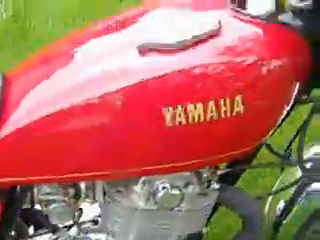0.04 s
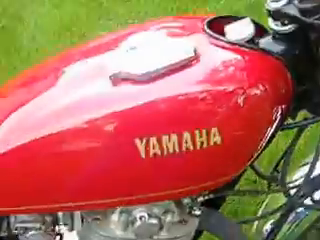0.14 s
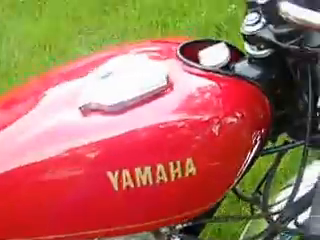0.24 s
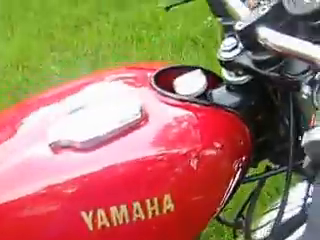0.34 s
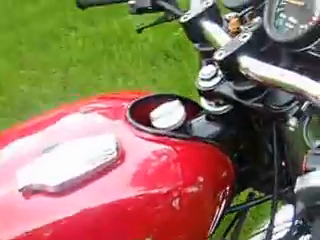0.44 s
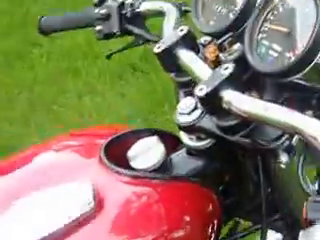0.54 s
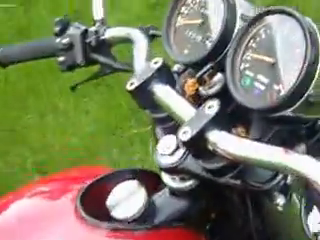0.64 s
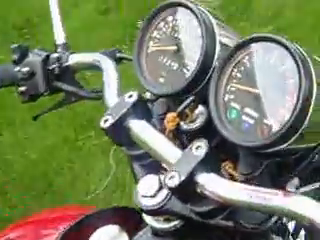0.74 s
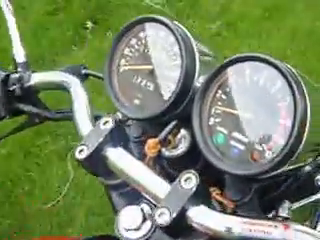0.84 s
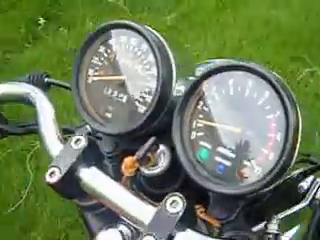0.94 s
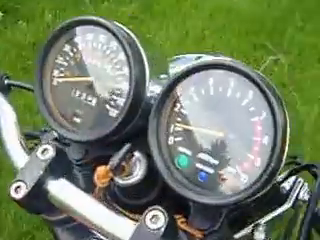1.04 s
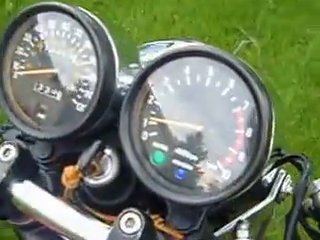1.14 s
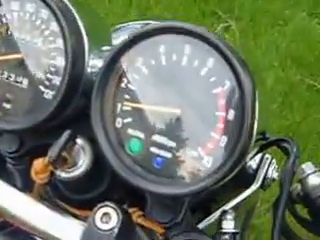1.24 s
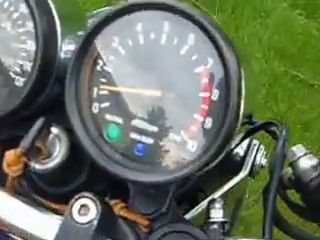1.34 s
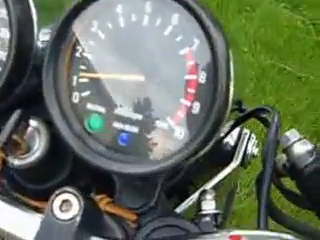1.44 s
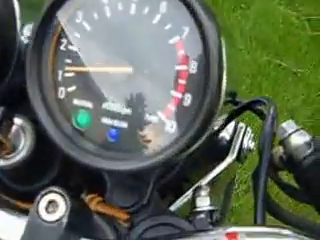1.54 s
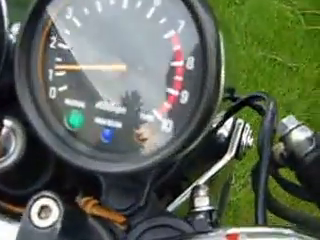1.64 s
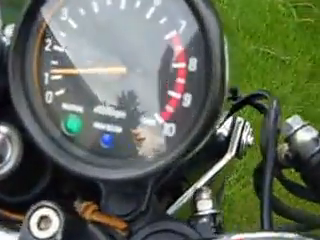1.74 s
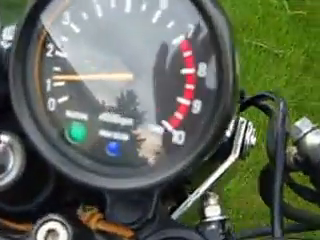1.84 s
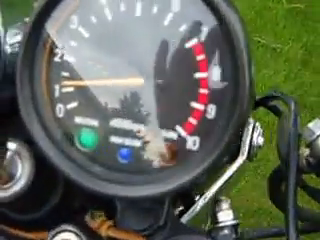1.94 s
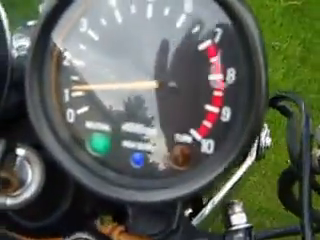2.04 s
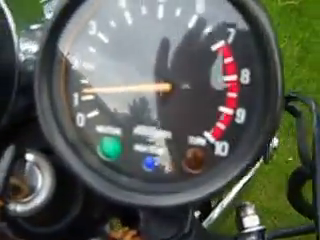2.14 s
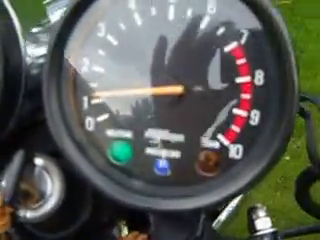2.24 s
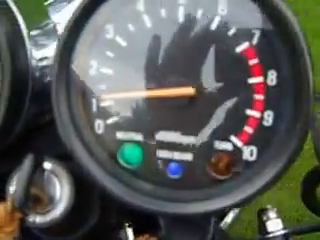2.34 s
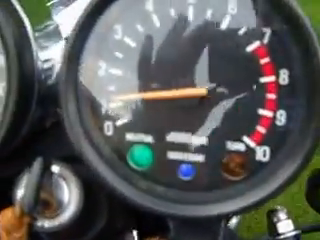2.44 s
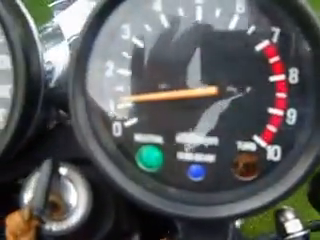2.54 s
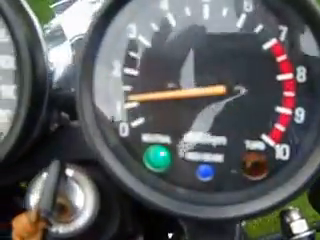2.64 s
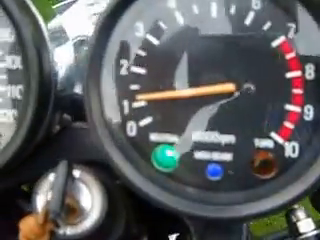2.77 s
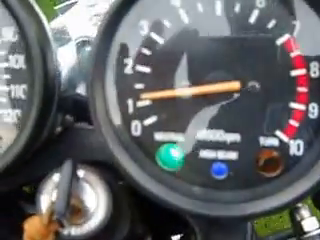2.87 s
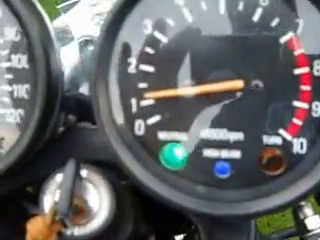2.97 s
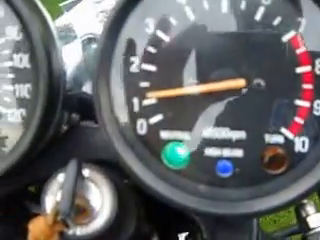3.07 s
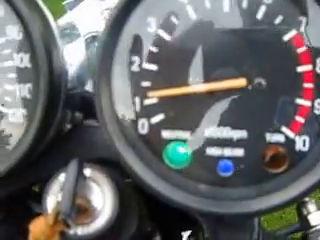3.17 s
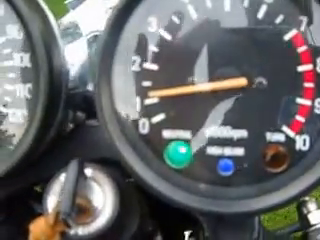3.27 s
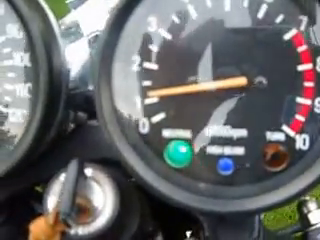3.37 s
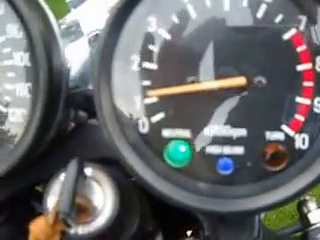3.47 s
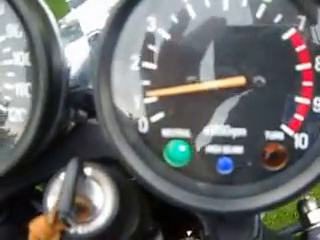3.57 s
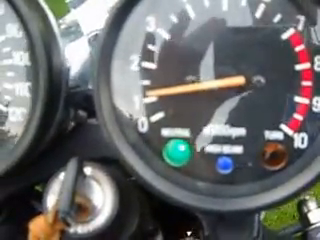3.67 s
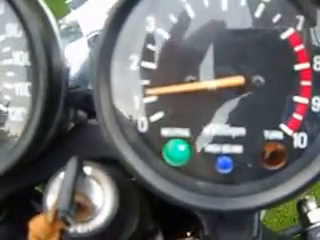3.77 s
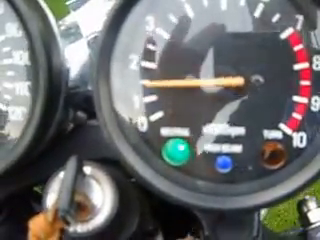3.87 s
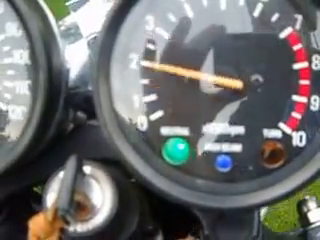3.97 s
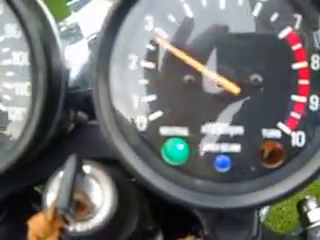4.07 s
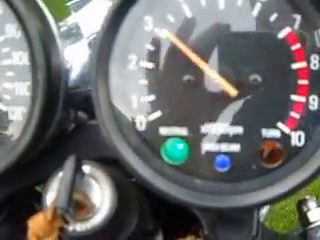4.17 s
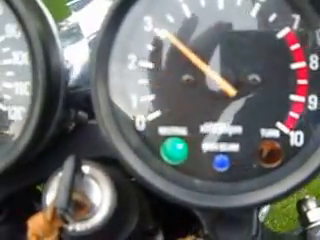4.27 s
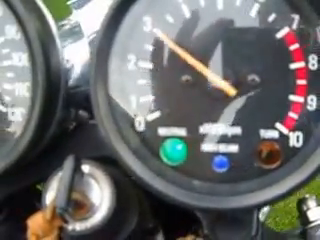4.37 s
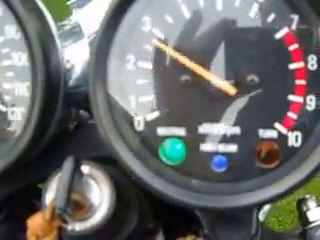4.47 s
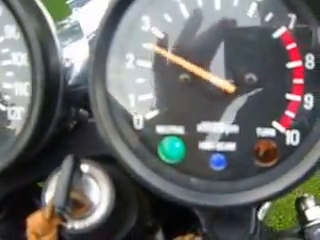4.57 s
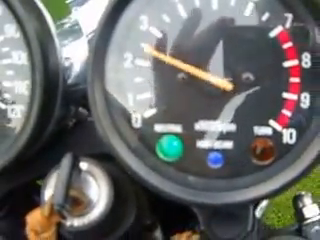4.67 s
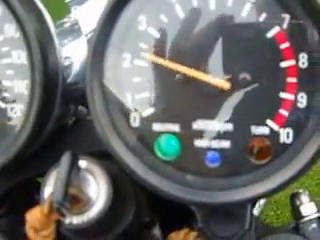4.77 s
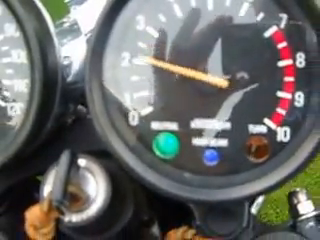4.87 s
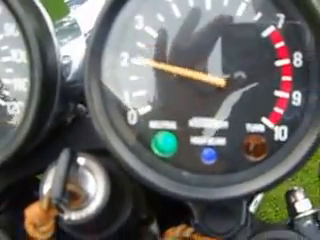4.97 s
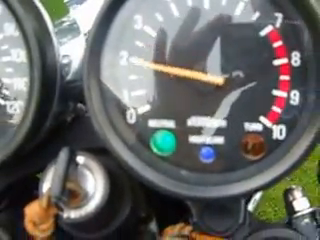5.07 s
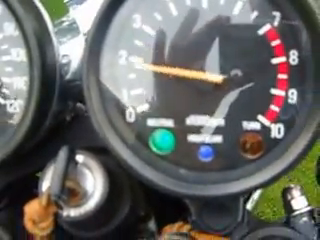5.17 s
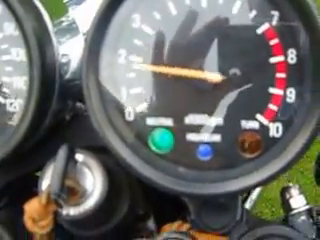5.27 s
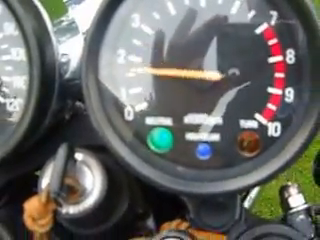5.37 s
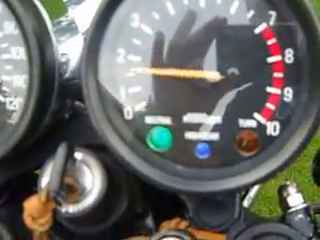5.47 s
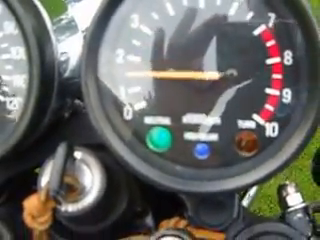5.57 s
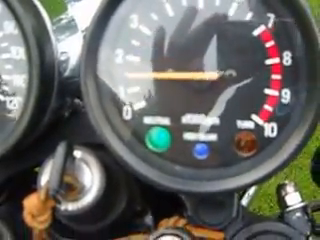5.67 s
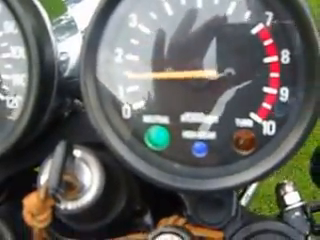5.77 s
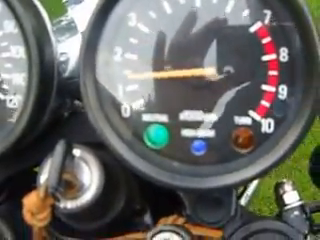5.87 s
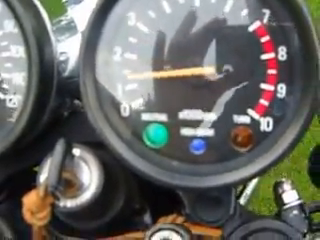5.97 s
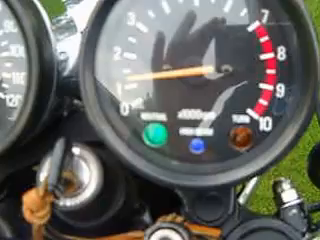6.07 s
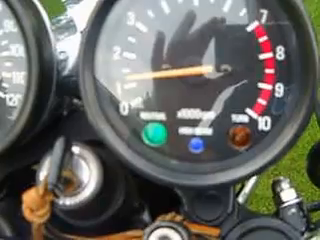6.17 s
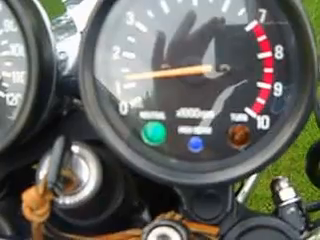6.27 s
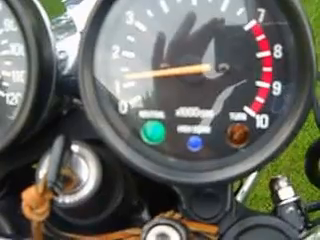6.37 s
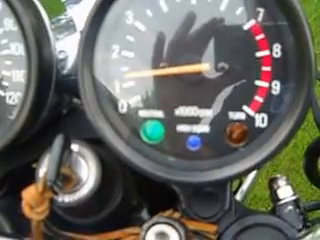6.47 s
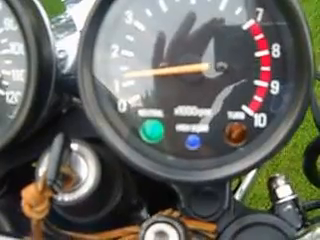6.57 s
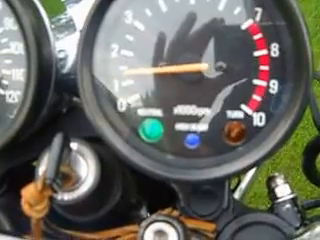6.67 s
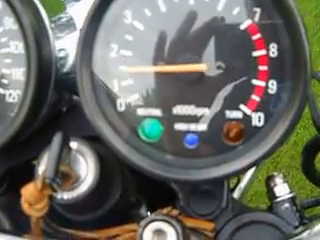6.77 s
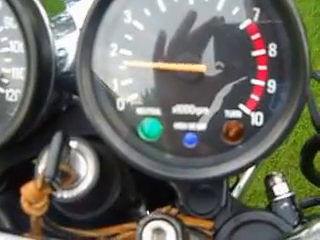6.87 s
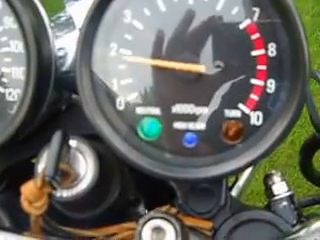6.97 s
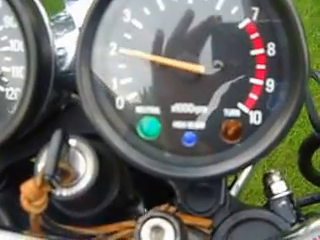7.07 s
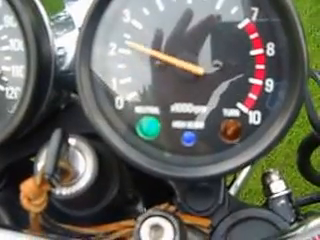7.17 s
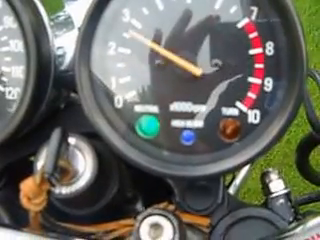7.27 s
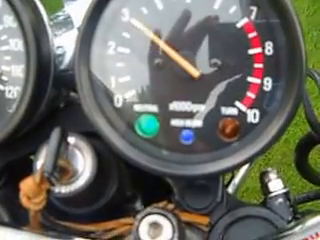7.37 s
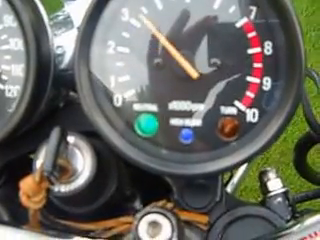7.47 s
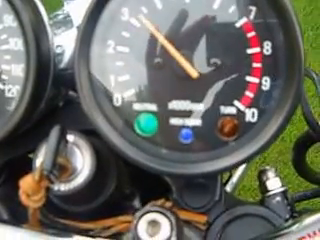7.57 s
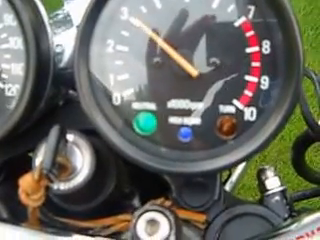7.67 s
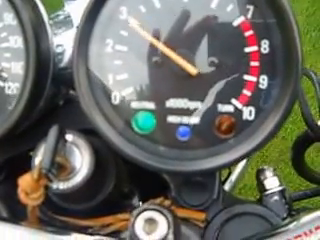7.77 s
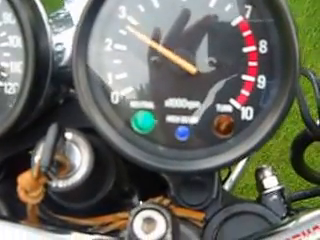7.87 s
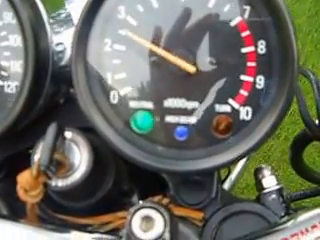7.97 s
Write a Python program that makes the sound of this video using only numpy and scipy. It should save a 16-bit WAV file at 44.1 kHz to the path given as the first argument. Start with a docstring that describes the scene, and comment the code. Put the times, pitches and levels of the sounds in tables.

```python
"""A single-cylinder four-stroke motorcycle idles, then its throttle is blipped twice, near 4 s and 7.4 s.
From the start each firing thumps through the exhaust pipe, built from decaying sines and a crack of noise.
Around the thumps run a steady whirr, ticking valve gear and fins, and gulps of intake air: shaped noise.
Firings ring the silencer shell; the blips bring metallic knocks and honks from the carburettor.
A dull microphone, moving from the cylinder head up to the bars, overloads on the loud peaks."""
import sys
import numpy as np
from scipy import signal
from scipy.fft import rfft, irfft
from scipy.io import wavfile

SR = 44100
rng = np.random.default_rng(int(sys.argv[2]) if len(sys.argv) > 2 else 0)


def to_wav(s):
    """Save 16-bit WAV."""
    ch = np.atleast_2d(s).T  # columns
    pcm = np.round(np.clip(ch, -1, 1) * 32767)  # PCM
    wavfile.write(sys.argv[1], SR, pcm.astype(np.int16))


N = 353241


def from_db(db):
    """Decibels to gain."""
    return 10 ** (np.asarray(db) / 20)


def rms_one(x):
    """Scale to rms 1."""
    return x / np.sqrt(np.mean(x ** 2) + 1e-20)


def curve(rows, s):
    """Read a (time, value) table at the times s, with straight lines between its rows."""
    return np.interp(s, *np.transpose(rows))


def resonance(x, hz, width_hz):
    """Two-pole peak of gain 1."""
    r = np.exp(-np.pi * width_hz / SR)
    peak = [1, -2 * r * np.cos(2 * np.pi * hz / SR), r * r]
    return signal.lfilter(np.array([1, 0, -1]) * (1 - r * r) / 2, peak, x)


def through(x, modes):
    """Parallel resonances with alternating signs, rms 1."""
    total = 0
    for k, (hz, width_hz, level_db) in enumerate(modes):
        total = total + (-1) ** k * from_db(level_db) * resonance(x, hz, width_hz)
    return rms_one(total)


def strike(modes, s, blow_db):
    """Each blow strikes every decaying mode with a strength of its own."""
    spread_db = 3
    chance, out = rng.standard_normal((len(s), len(modes))), 0
    for k, (hz, level_db, t60) in enumerate(modes):
        blows = np.full(N, 1e-18)
        blows[(s * SR).astype(int)] = from_db(blow_db + level_db + spread_db * chance[:, k])
        r, w = from_db(-60 / (t60 * SR)), 2 * np.pi * hz / SR
        out = out + signal.lfilter([0, np.sin(w)], [1, -2 * r * np.cos(w), r * r], blows)
    return out


def gritty():
    """White noise with a heavy tail of sharp grains, rms 1."""
    grain_db = 1.0
    grains = from_db(grain_db * np.minimum(rng.exponential(1, N), 5))
    return rms_one(rng.standard_normal(N) * grains)


# engine speed as the time from one firing to the next: (time [s], cycle length [ms])
CYCLE_LENGTH = [(-0.034, 105.1), (0.07, 107.35), (0.76, 104.08), (1.444, 104.44), (1.757, 106.75),
                (2.181, 102.88), (3.352, 108.73), (3.461, 103.45), (3.676, 109.49), (3.786, 96.56),
                (4.013, 44.56), (4.135, 32.84), (4.434, 43.69), (5.126, 63.81), (5.256, 72.47),
                (6.033, 103.91), (6.442, 100.57), (6.64, 92.96), (6.815, 72.81), (7.281, 42.64),
                (7.473, 32.23), (8.0, 49.51)]
IDLE_MS = 105


def speed_db(s):
    """Engine speed over idle, in dB."""
    return 20 * np.log10(IDLE_MS / curve(CYCLE_LENGTH, s))


# firings that stand out:
# (time [s], added thump level [dB], delay of the next firing [ms], added crack level [dB])
UNEVEN_FIRINGS = [(.708, 0, 0, 3), (.809, 0, 0, -2), (1.02, -1.4, 6, 0), (1.338, 0, 0, 5),
                  (1.444, 0, 0, -3), (1.757, 0, 0, 4), (2.49, -2.1, 6, 0), (2.811, 0, 0, 6),
                  (3.131, -1.2, 6, 0), (3.565, -.8, 6, 0), (3.676, 0, 0, 4), (3.786, 0, 0, 5),
                  (4.135, 3, 0, 0), (4.169, -5, 0, 0), (4.392, -15, 0, 0), (4.569, 5, 0, 0),
                  (4.663, -3, 0, -3), (4.715, -6, 6, -3), (4.778, -16, 0, 0), (5.058, -5.5, 6, 0),
                  (5.126, -4.5, 0, -5), (5.256, -13, 0, -8), (5.33, 0, 0, 7), (5.928, -4.4, 6, 0),
                  (7.806, -15, 0, -4), (7.846, 3, 0, 0), (7.89, -13, 0, 0), (7.935, -13, 0, 0)]
# charge drawn in: (time [s], load [0 at idle, 1 at throttle wide open])
THROTTLE_LOAD = [(0, 0), (3.7, 0.04), (3.8, 0.08), (3.96, 0.23), (4.05, 0.92), (4.175, 1), (4.195, 0.16),
                 (4.4, 0), (4.78, 0), (4.83, .22), (5.03, 0.05), (5.2, 0.31), (5.74, 0.24), (5.93, 0.08),
                 (6.45, 0.1), (6.55, 0.22), (6.85, 0.28), (6.96, 0.17), (7.28, 0.54), (7.33, 0.86),
                 (7.51, 0.95), (7.535, 0.21), (7.76, -.15), (8.01, 0.26)]
# level of the crack before spread and gas heat: (time [s], level [dB])
CRACK_LEVEL = [(0, 1.5), (.7, -4.5), (1.2, -11), (3.8, -10.5), (4, -10.5), (5.3, -22.5), (5.9, -12.5),
               (6.25, -9.5), (6.4, -4), (6.75, -4.5), (6.95, -11.5), (7.2, -21), (7.4, -12), (8, -19)]
FIRST_FIRING_S = -.0344
# pipe pitch rises with firing rate above idle [per Hz] and with load
HEAT_PER_FIRING_HZ, HEAT_LOAD = .017, .3
THUMP_LOAD_DB, THUMP_SPEED_DB, THUMP_SPREAD_DB = 1, 0.31, 0.57   # at full load; per dB of speed
# the silencer tone grows per dB of speed above a threshold, between two limits
LINGER_IDLE_DB, LINGER_TOP_DB, LINGER_FROM_DB, LINGER_PER_DB, LINGER_SPREAD_DB = -18, -6, 5, 5.5, 3
CRACK_SPREAD_DB = 1.5


def firings():
    """Step from firing to firing; rows of (s, thump dB, pitch factor, lingering tone dB, crack dB)."""
    odd_s, odd_thump_db, late_ms, odd_crack_db = np.transpose(UNEVEN_FIRINGS)
    s, extra = [FIRST_FIRING_S], []
    while s[-1] < N / SR:
        odd = np.abs(odd_s - s[-1]) < .012   # rows that belong to this firing
        extra.append((odd @ odd_thump_db, odd @ odd_crack_db))
        s.append(s[-1] + (curve(CYCLE_LENGTH, s[-1]) + odd @ late_ms) / 1000)
    s = np.array(s[:-1])
    extra_thump, extra_crack = np.transpose(extra)
    speed, load = speed_db(s), curve(THROTTLE_LOAD, s)
    chance = rng.standard_normal((len(s), 3)).T

    rate_above_idle = 1000 * (1 / curve(CYCLE_LENGTH, s) - 1 / IDLE_MS)
    heat = 1 + HEAT_PER_FIRING_HZ * rate_above_idle + HEAT_LOAD * load
    thump = extra_thump + THUMP_LOAD_DB * load + THUMP_SPEED_DB * speed + THUMP_SPREAD_DB * chance[0]
    linger = LINGER_IDLE_DB + LINGER_PER_DB * (speed - LINGER_FROM_DB)
    linger = np.clip(linger, LINGER_IDLE_DB, LINGER_TOP_DB) + LINGER_SPREAD_DB * chance[1]
    crack = curve(CRACK_LEVEL, s) + extra_crack + CRACK_SPREAD_DB * chance[2]
    return np.transpose([s, thump, heat, linger, crack])


def cycles(fired):
    """Engine cycles completed since the first firing, sample by sample."""
    at = fired[:, 0]
    at = np.append(at, 2 * at[-1] - at[-2])
    return np.interp(np.arange(N) / SR, at, np.arange(len(at)))


def since(turn, start):
    """Share of a cycle since the crank passed a mark, and a gain that changes from cycle to cycle."""
    spread_db = 1.3
    passed = turn - start + 1
    gains = from_db(spread_db * rng.standard_normal(int(turn[-1]) + 3))
    return passed % 1, gains[passed.astype(int)]


def swell(turn, start, length):
    """A smooth swell of flow over part of each cycle."""
    share, chance = since(turn, start)
    return chance * np.sin(np.pi * np.minimum(share / length, 1)) ** 2


# exhaust modes at idle heat: (frequency [Hz], height with polarity [linear], t60 [s])
PIPE_MODES = [(70.7, -4.3, .067), (84.8, 5.0, .066), (120.6, .49, .183), (218.8, 3.95, .048),
              (209.8, -5.0, .03)]
LINGER_HZ, LINGER_DELAY_S, LINGER_T60_S = 84, .025, .3   # at idle heat
CRACK_DELAY_S, CRACK_S, CRACK_LOW_HZ, CRACK_HIGH_HZ = .0025, 0.0037, 2010, 4200
CRACK_HEAT_DB, HOT_CHARGE_DB = 3, 8.5   # per unit of pitch factor


def exhaust(fired):
    """Each firing rings the pipe; hotter gas carries sound faster, so modes rise and die sooner."""
    out, hiss = np.zeros(N), rng.standard_normal(N)
    band = signal.butter(2, [CRACK_LOW_HZ, CRACK_HIGH_HZ], "band", fs=SR, output="sos")
    hiss = rms_one(signal.sosfilt(band, hiss))
    for s, thump_db, heat, linger_db, crack_db in fired:
        n = np.arange(max(int(s * SR) + 1, 0), min(int(s * SR) + SR // 4, N))
        t = n / SR - s
        thump = 0
        for hz, height, t60 in PIPE_MODES:
            thump = thump + height * from_db(-60 * t * heat / t60) * np.sin(2 * np.pi * hz * heat * t)
        # the silencer tone sets in behind the thump and outlasts it
        late = np.maximum(t * heat - LINGER_DELAY_S, 0)
        linger = from_db(linger_db - 60 * late / LINGER_T60_S) * np.sin(2 * np.pi * LINGER_HZ * late)
        # gas rips past the opening valve for a few milliseconds
        crack = np.sin(np.pi * np.clip((t - CRACK_DELAY_S) / CRACK_S, 0, 1)) ** 2 * hiss[n]
        crack = crack / np.max(np.abs(crack) + 1e-9)
        # a hotter charge also leaves at higher pressure, and its crack is sharper
        out[n] += from_db(HOT_CHARGE_DB * (heat - 1)) * (from_db(thump_db) * thump + linger)
        out[n] += from_db(crack_db + CRACK_HEAT_DB * heat) * crack
    return out


# colour of the running noise: (frequency [Hz], relative density [dB per Hz])
WHIRR_COLOUR = [(24, -27.5), (40, -11.5), (88, -2.5), (167, -13.5), (239, -18), (292, -16), (365, -17),
                (708, -21.5), (957, -20), (1290, -36), (2320, -43.5), (3750, -61), (4870, -51.5),
                (6330, -81), (10700, -120)]


def whirr():
    """Chain, gears and bearings: steady coloured noise."""
    hz = np.maximum(np.fft.rfftfreq(N, 1 / SR), 1)
    colour_hz, colour_db = np.transpose(WHIRR_COLOUR)
    colour = np.interp(np.log(hz), np.log(colour_hz), colour_db)
    return rms_one(irfft(rfft(rng.standard_normal(N)) * from_db(colour), N))


# valve gear contacts: (place after firing [share of cycle], relative level [dB],
# decay by 20 dB at idle [cycles], body frequency [Hz], body width [Hz])
VALVE_CONTACTS = [(0.118, -3.5, 0.14, 2293, 414), (.33, -11.5, 0.16, 1910, 201.3),
                  (0.372, -1.5, 0.24, 2150, 298), (0.391, -3, 0.2, 3480, 914),
                  (.69, -2.5, 0.09, 3660, 1223), (.7, -1.5, 0.34, 3424, 202), (0.721, -7, 0.36, 4520, 300),
                  (0.769, -0.5, 0.57, 2324, 242), (0.831, -3.5, 0.37, 1868, 198),
                  (0.802, -2.5, 0.25, 3030, 507)]
TICK_DB = 20   # over the rattle
RATTLE_BLUR = .5   # 0: a rattle lasts a share of the cycle, 1: a fixed time, so it fills fast cycles


def valve_gear(turn):
    """Each contact is a sharp tick and a fading rattle that ring a part of the cylinder head."""
    out, stretch = 0, from_db(RATTLE_BLUR * speed_db(np.arange(N) / SR))
    for start, level_db, decay, hz, width_hz in VALVE_CONTACTS:
        share, chance = since(turn, start)
        tick = from_db(TICK_DB) * (np.diff(share, prepend=0) < 0)
        rattle = from_db(-20 * share / (decay * stretch)) * gritty()
        burst = chance * (tick + rattle)
        body = resonance(resonance(burst, hz, 2 * width_hz), hz, width_hz)
        out = out + from_db(level_db) * rms_one(body)
    return rms_one(out)


# cooling fin resonances: (frequency [Hz], width [Hz], relative level [dB])
FIN_MODES = [(1853, 76, 0.5), (2328, 66, 2.5), (2983, 210, -5.5), (3300, 160, -10.5), (3624, 110, -9.5),
             (4250, 17, -8.5), (4930, 91, -0.5)]


def fins():
    """Cooling fins sing with the cam chain: gritty noise through their resonances."""
    return through(gritty(), FIN_MODES)


# air drawn or pushed through the ports:
# (start [share of cycle], length [share of cycle], relative level [dB])
AIR_GULPS = [(0.049, 0.16, -2.5), (0.222, 0.23, -3.5), (0.499, 0.12, -15), (0.759, 0.27, -2.5)]
# intake tract resonances: (frequency [Hz], width [Hz], relative level [dB])
INTAKE_MODES = [(326, 116, 0), (567.7, 66, 4), (640, 262, -3), (957, 45, 3.5), (1007, 117, -8.5)]


def intake(turn):
    """Turbulent gulps of air sound the intake tract."""
    flow = sum(from_db(level_db) * swell(turn, start, length) for start, length, level_db in AIR_GULPS)
    return through(flow * rng.standard_normal(N), INTAKE_MODES)


# open carburettor throat: (frequency [Hz], width [Hz], relative level [dB])
THROAT_MODES = [(284.8, 26, 11.5), (555, 15, -5.5), (786, 150, -4.5), (1770, 54, -15.5), (2240, 290, -13),
                (3200, 52, -29.5), (3580, 330, -31)]
ROAR_START, ROAR_LENGTH = 0.5, 0.79   # shares of the cycle


def roar(turn):
    """Air noise roars through the carburettor throat, swelling over the intake stroke."""
    flow = swell(turn, ROAR_START, ROAR_LENGTH) + 1.4
    return through(flow * rng.standard_normal(N), THROAT_MODES)


# silencer shell and frame: (frequency [Hz], relative level [dB], t60 [s])
SHELL_MODES = [(33.8, -14.5, 0.21), (235.3, -18.5, 0.3), (354.3, -9, 0.084), (551.8, -23, 0.21),
               (656.6, -25, 0.28), (954.5, -23, 0.15)]


def shell(fired):
    """Every firing after the first strikes the silencer shell and frame, as hard as its thump."""
    return strike(SHELL_MODES, fired[1:, 0], fired[1:, 1])


# metallic knocks around the two blips: (time [s], blow level [dB])
KNOCK_BLOWS = [(3.8722, -2), (3.95, 3.5), (4.008, 9), (4.0496, 12), (4.0947, 12), (4.159, 1), (4.1936, -3),
               (6.723, -3), (6.885, -3), (7.305, -1), (7.35, -4), (7.391, 2), (7.4337, 1), (7.46, 0),
               (7.494, 1), (7.705, 1), (7.7843, 4), (7.872, 0)]
# cylinder head: (frequency [Hz], relative level [dB], t60 [s])
HEAD_MODES = [(1798, -9.5, 0.03), (2360, -23.5, 0.012), (3030, -18.5, 0.043)]


def knocks():
    """Single metallic blows ring the cylinder head."""
    return strike(HEAD_MODES, *np.transpose(KNOCK_BLOWS))


# the loudest intake honks: (time of the peak [s], frequency [Hz], peak level [dB])
LOUD_HONKS = [(3.935, 278, -1), (3.971, 540, 0), (3.998, 282, 6), (4.027, 553, 8), (4.047, 302, 7.5),
              (4.175, 290, 5.5), (4.244, 300, 10.5), (4.276, 294, 0), (4.337, 564, 4.5), (4.337, 338, 4.5),
              (4.465, 568, 1), (4.511, 524, 3), (4.533, 244, 12.5), (4.603, 533, 0), (4.626, 251, 7.5),
              (7.36, 295, -2), (7.48, 510, 9), (7.513, 510, 7.5), (7.597, 605, 1), (7.633, 298, 4),
              (7.793, 580, -2.5), (7.88, 570, -4.5), (7.992, 280, 7)]
# fainter honks of fast cycles: (place after firing [share of cycle], frequency at idle [Hz],
# rise of frequency [Hz per firing Hz], level before spread [dB])
FAINT_HONKS = [(.13, 215, 4.2, -4.5), (.7, 442, 7.7, -13)]
HONK_FROM_DB = 5   # speed over idle; below it the faint honks drop by 20 dB per dB
HONK_SPREAD_DB, HONK_SPREAD_HZ = 4, 11
HONK_RISE_S, HONK_FALL_S = 0.0047, 0.0067


def honk_rows(fired):
    """The loud honks, and a fainter pair in every fast cycle."""
    s, length = fired[:-1, 0], np.diff(fired[:, 0])
    rows = list(LOUD_HONKS)
    for share, hz, hz_per_rate, level_db in FAINT_HONKS:
        chance = rng.standard_normal((len(s), 2)).T
        pitch = hz + hz_per_rate * (1 / length - 1000 / IDLE_MS) + HONK_SPREAD_HZ * chance[0]
        slow_db = 20 * np.minimum(speed_db(s) - HONK_FROM_DB, 0)
        level = level_db + HONK_SPREAD_DB * chance[1] + slow_db
        rows += list(zip(s + share * length, pitch, level))[1:]
    return rows


def honks(fired):
    """A sharp intake stroke sets the air column of the carburettor ringing in a short sine burst."""
    out = np.zeros(N)
    for s, hz, level_db in honk_rows(fired):
        n = np.arange(int(s * SR) - SR // 40, min(int(s * SR) + SR // 20, N))
        t = n / SR - s
        shape = np.exp(-(t / np.where(t < 0, HONK_RISE_S, HONK_FALL_S)) ** 2)
        out[n] += from_db(level_db) * shape * np.sin(2 * np.pi * (hz * t + rng.random()))
    return out


# the microphone starts beside the cylinder head and moves up to the bars:
# (time [s], change of valve gear and fins [dB])
NEAR_HEAD_LEVEL = [(0, 2.5), (.5, 2), (1.1, 0.4), (8, -0.6)]
# layers follow speed and load: (dB at idle, dB per dB of speed, dB added at full load)
GEAR, GULP, THROAT, DRIVE = (-28, 0.87, 1.5), (-22, 0.61, 6.1), (-31, 1.97, 6.6), (-19.5, 1.395, 1.8)
FINS_DB = -3.5   # against the valve gear
LOAD_FADE_S = 0.12   # the air column calms this slowly


def scene():
    """The engine as it reaches the microphone."""
    t, fired = np.arange(N) / SR, firings()
    turn, speed = cycles(fired), speed_db(t)
    # load acts at once when it rises and lingers when it falls
    calm = np.exp(-1 / (LOAD_FADE_S * SR))
    load = curve(THROTTLE_LOAD, t)
    load = np.maximum(load, signal.lfilter([1 - calm], [1, -calm], load))

    def follow(layer):
        """Gain of a layer over time."""
        idle_db, per_db, load_db = layer
        return from_db(idle_db + per_db * speed + load_db * load)

    out = exhaust(fired) + follow(DRIVE) * whirr()
    head = valve_gear(turn) + from_db(FINS_DB) * fins()
    out += follow(GEAR) * from_db(curve(NEAR_HEAD_LEVEL, t)) * head
    out += follow(GULP) * intake(turn) + follow(THROAT) * roar(turn)
    out += shell(fired) + knocks() + honks(fired)
    return out[None]


MIC_BASS_HZ, MIC_TOP_HZ, SAMPLER_HZ, CUTOFF_HZ = 10, 3720, 5700, 16000
INPUT_TOP, REPLAY_TOP, OFFSET = .95, .974, .003   # full scale is 1
HISS_DB = -80   # faint hiss of the electronics


def record(dry):
    """Dull microphone, input overload, low sampling rate; filter overshoot clips once more on replay."""
    x = signal.sosfilt(signal.butter(4, MIC_TOP_HZ, fs=SR, output="sos"), dry)
    x = signal.sosfilt(signal.butter(1, MIC_BASS_HZ, "high", fs=SR, output="sos"), x)
    x = np.clip(x, -INPUT_TOP, INPUT_TOP)
    # a steep low-pass stands for the low sampling rate
    x = signal.sosfilt(signal.cheby2(14, 85, SAMPLER_HZ, fs=SR, output="sos"), x)
    x = np.clip(x + OFFSET, -REPLAY_TOP, REPLAY_TOP)
    x = x + from_db(HISS_DB) * rng.standard_normal(x.shape)
    return signal.sosfilt(signal.cheby2(12, 70, CUTOFF_HZ, fs=SR, output="sos"), x)


dry = scene()
out = record(dry)
to_wav(out)
```